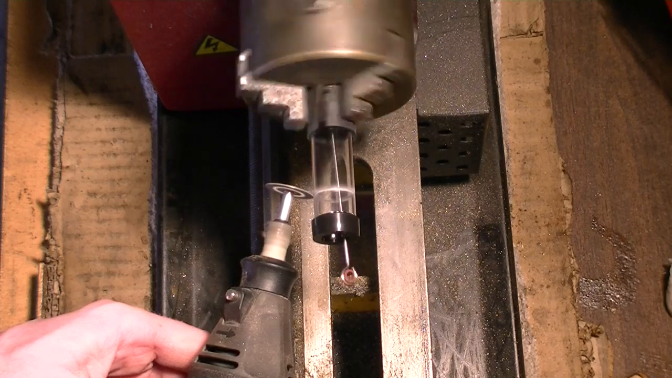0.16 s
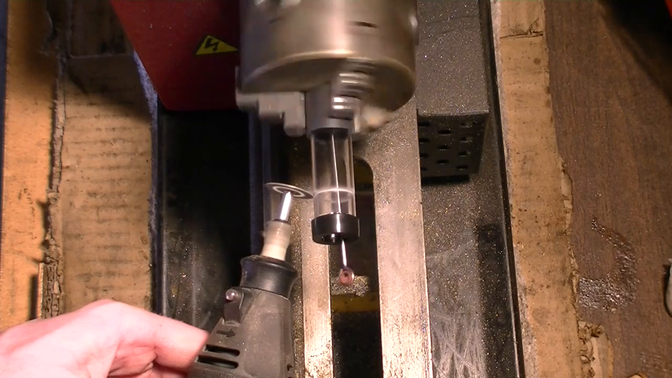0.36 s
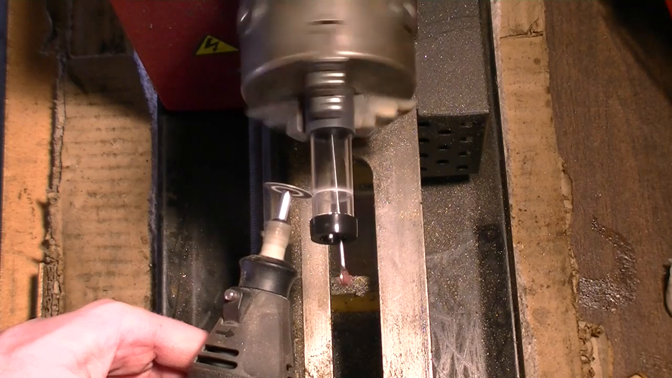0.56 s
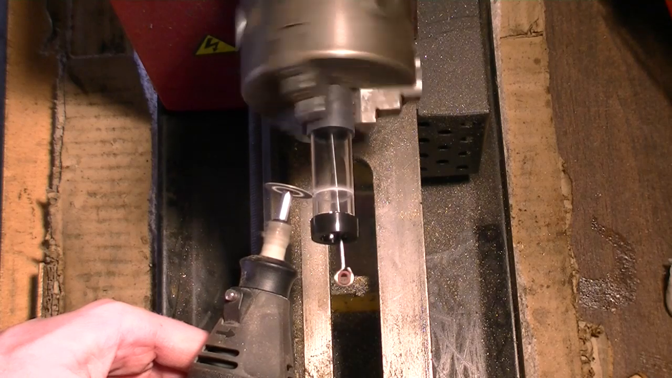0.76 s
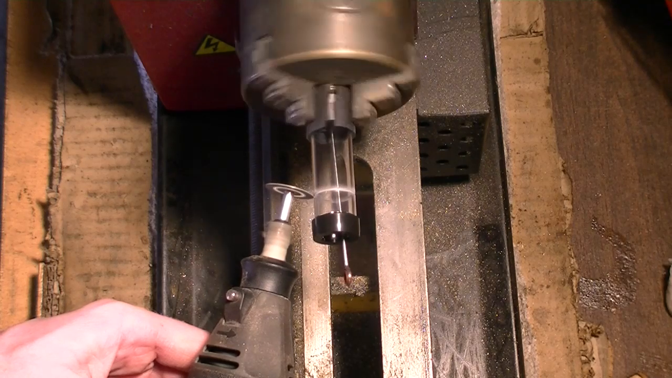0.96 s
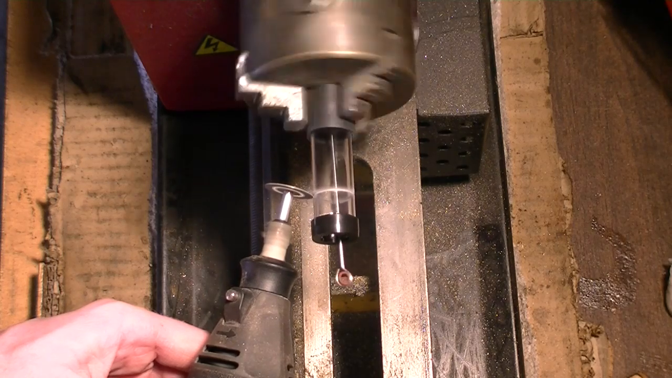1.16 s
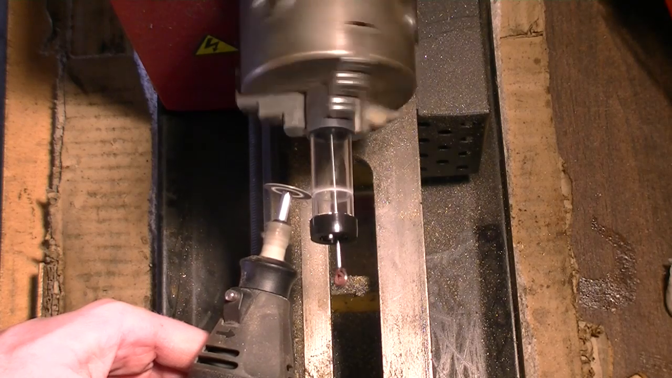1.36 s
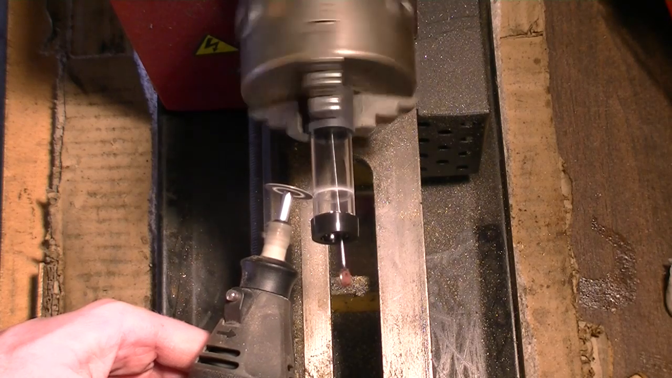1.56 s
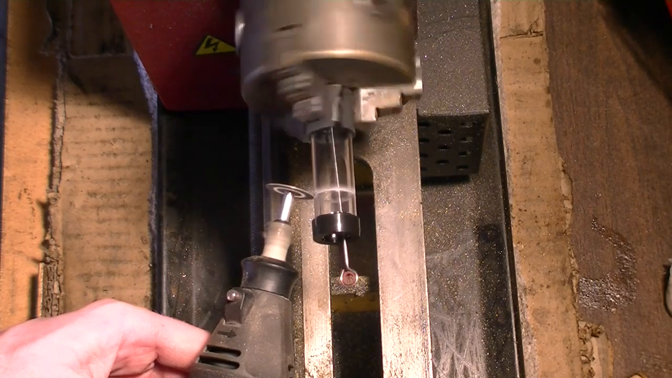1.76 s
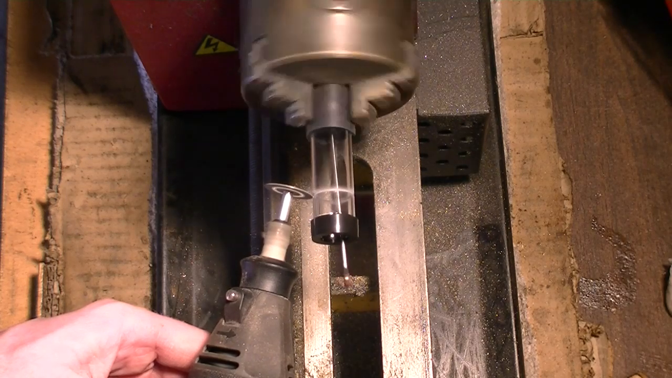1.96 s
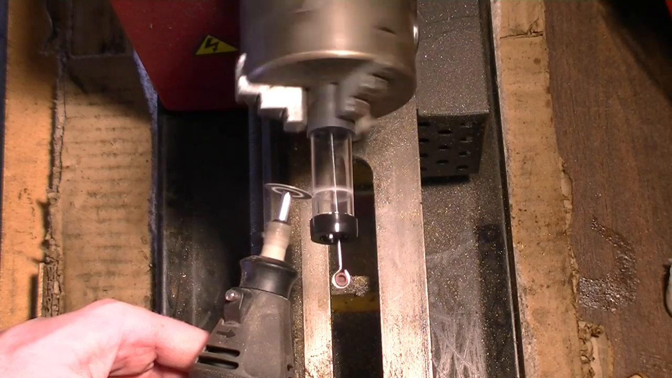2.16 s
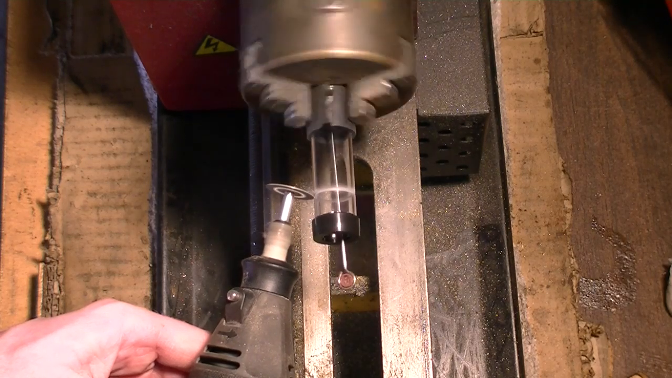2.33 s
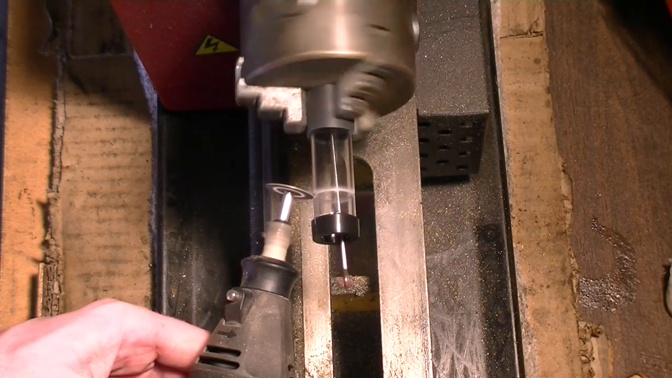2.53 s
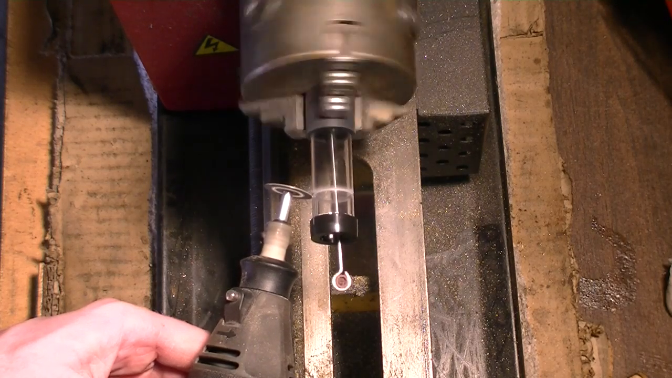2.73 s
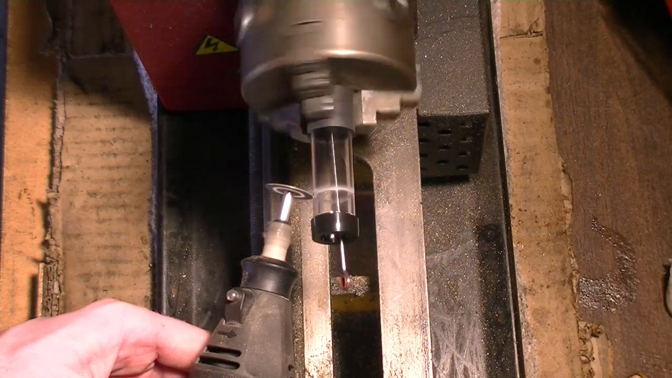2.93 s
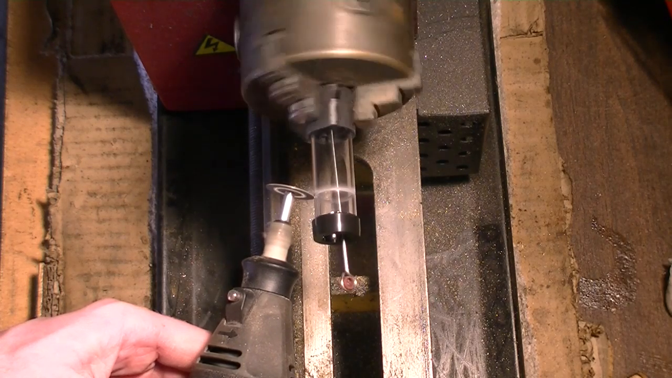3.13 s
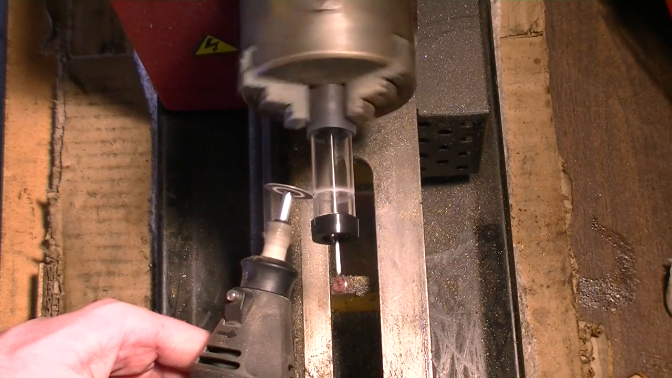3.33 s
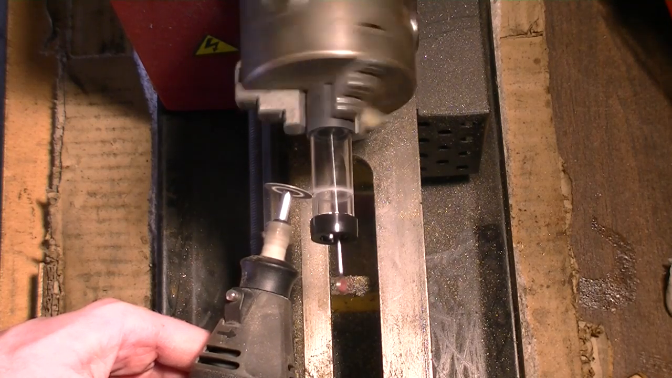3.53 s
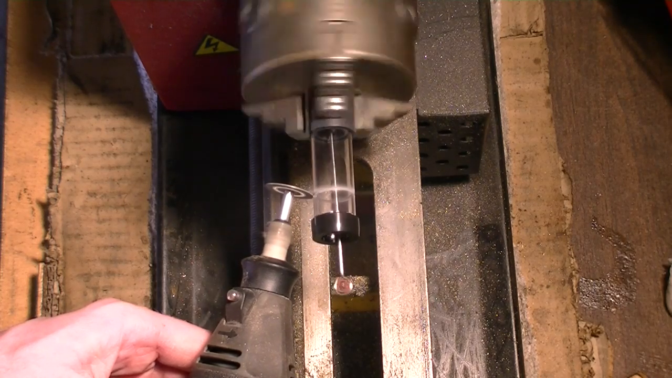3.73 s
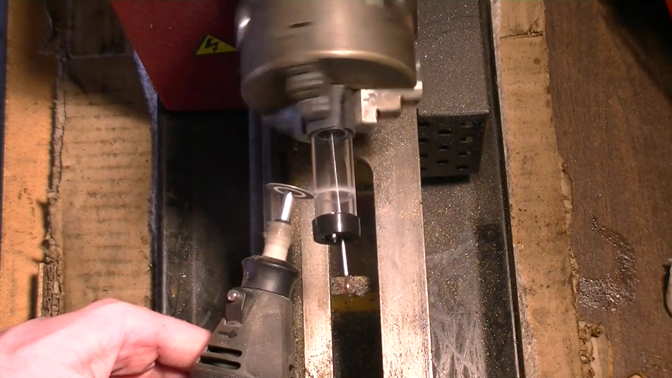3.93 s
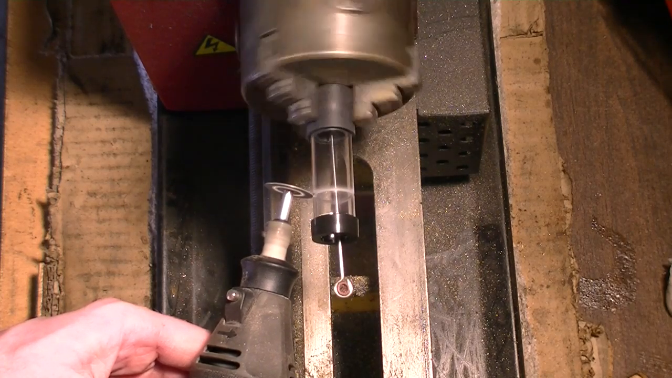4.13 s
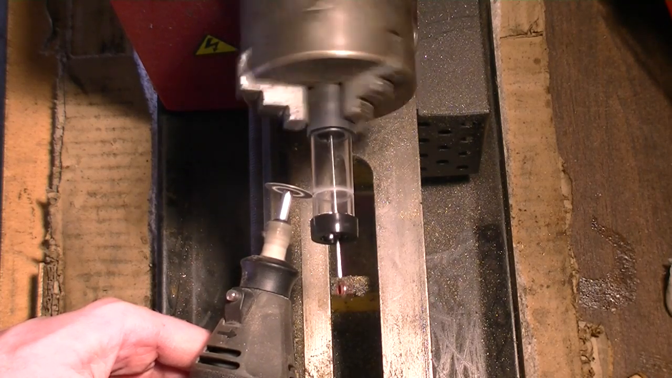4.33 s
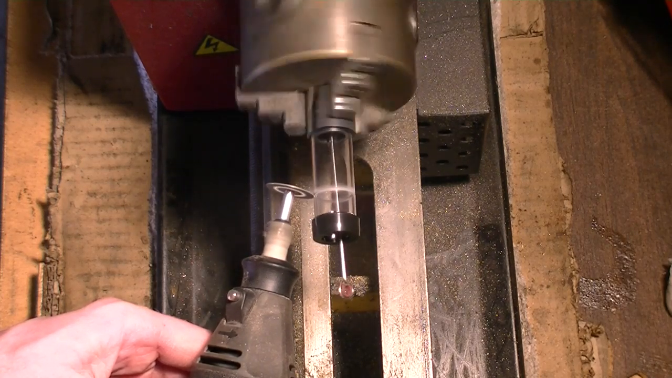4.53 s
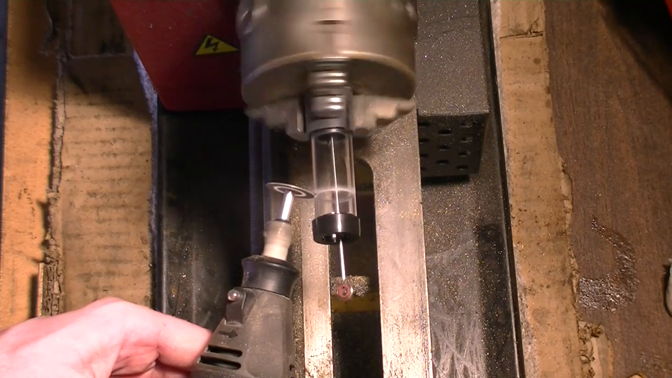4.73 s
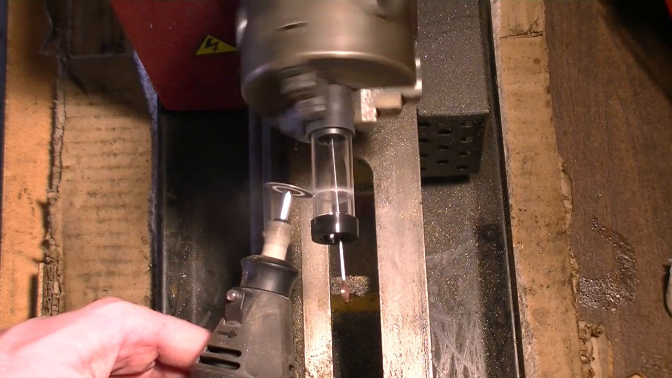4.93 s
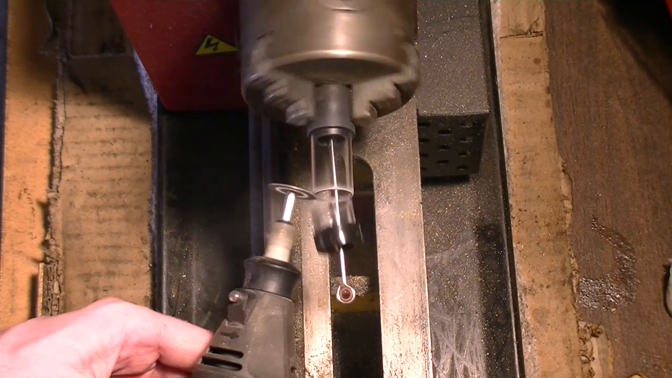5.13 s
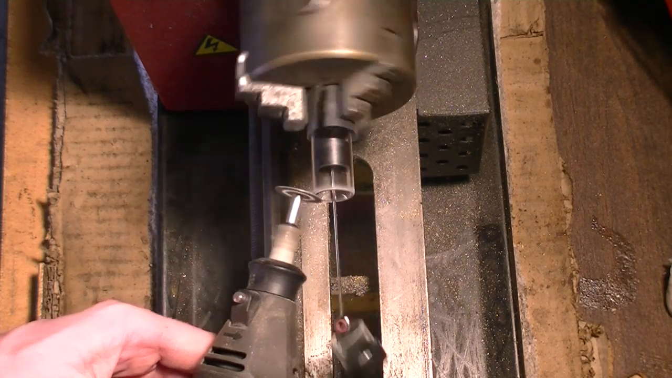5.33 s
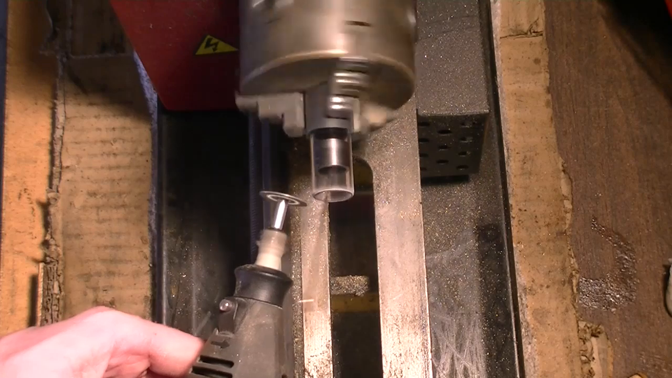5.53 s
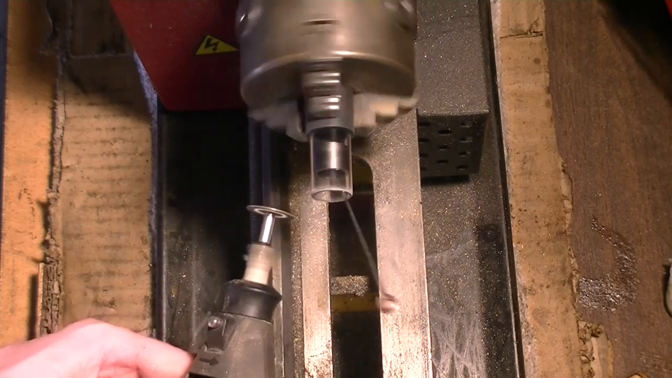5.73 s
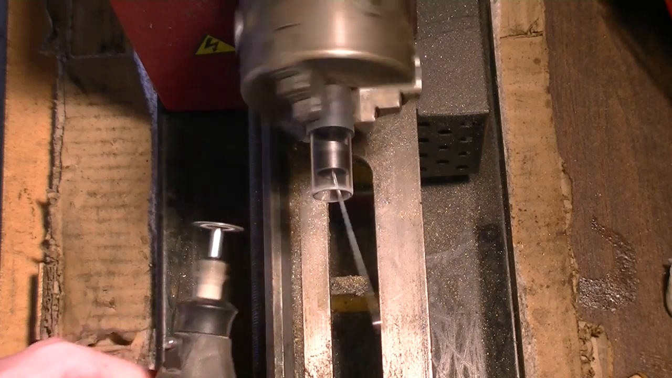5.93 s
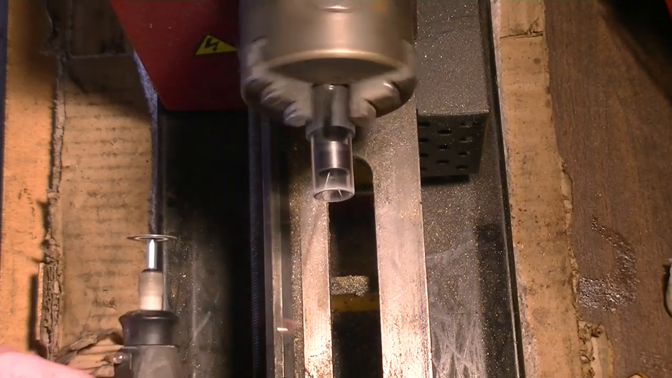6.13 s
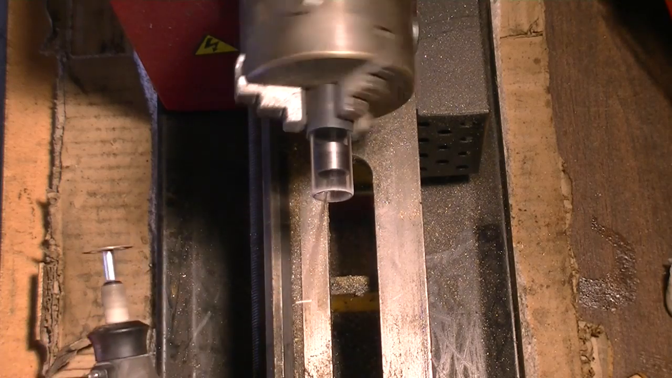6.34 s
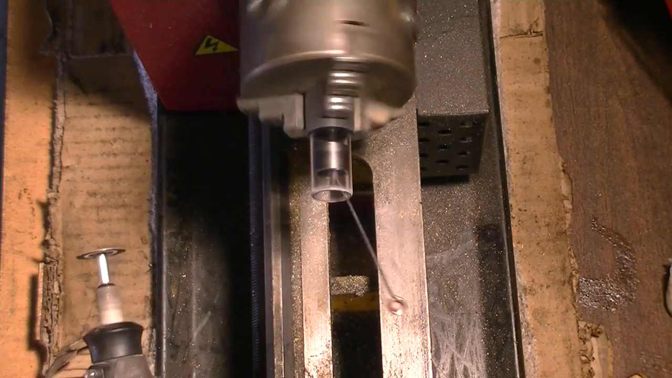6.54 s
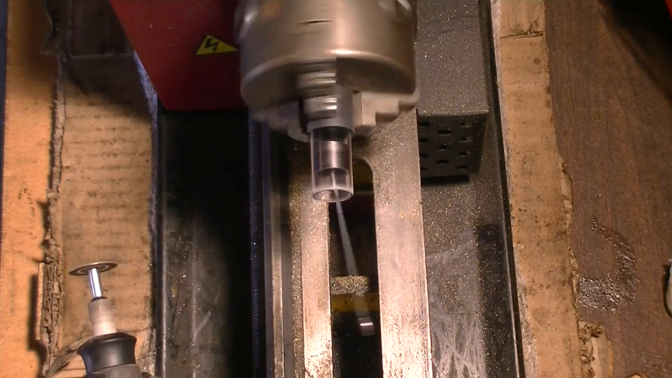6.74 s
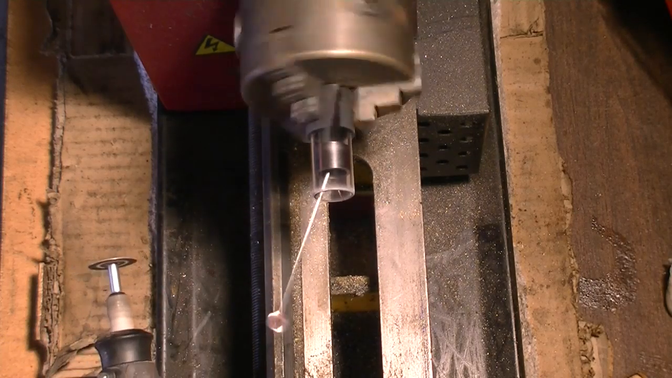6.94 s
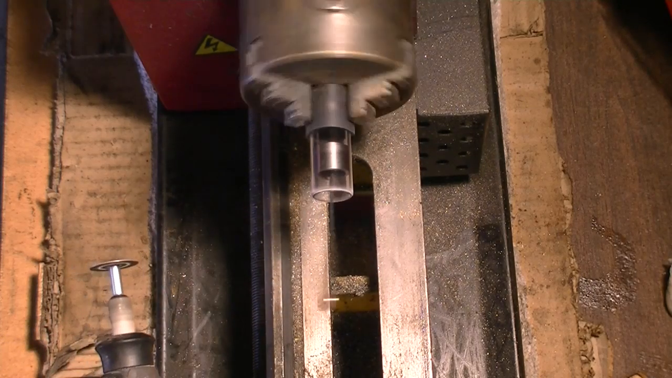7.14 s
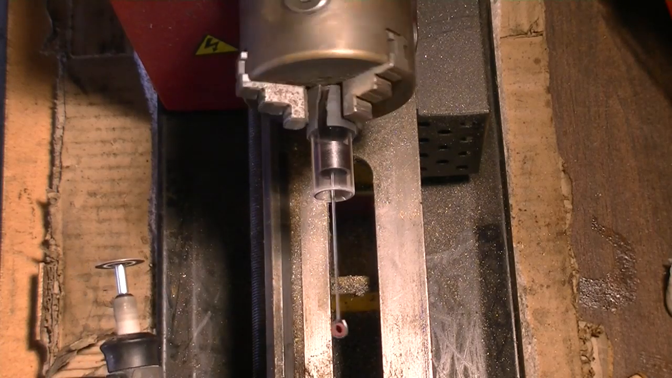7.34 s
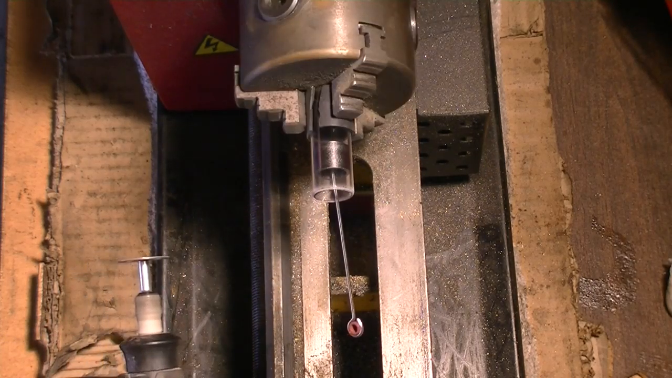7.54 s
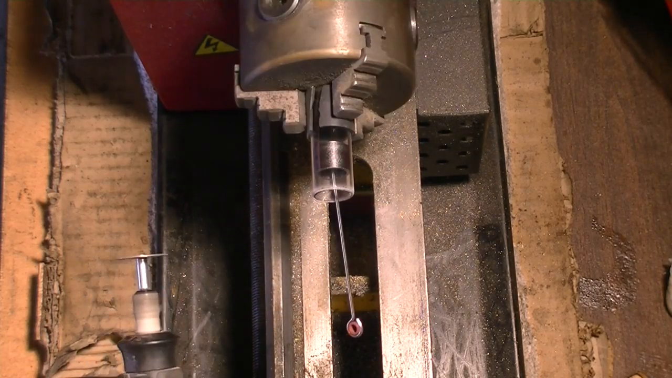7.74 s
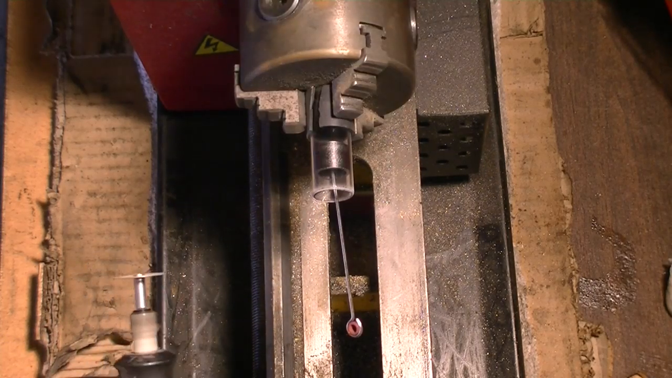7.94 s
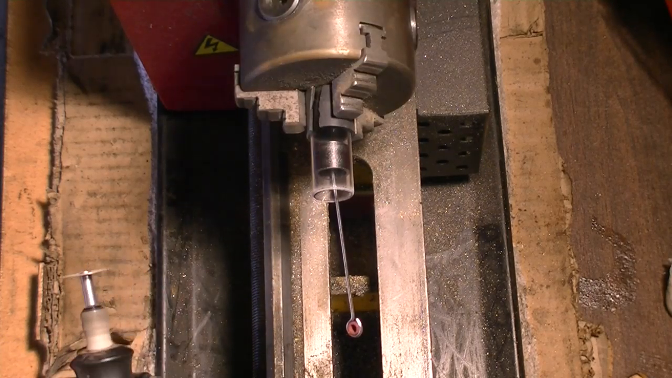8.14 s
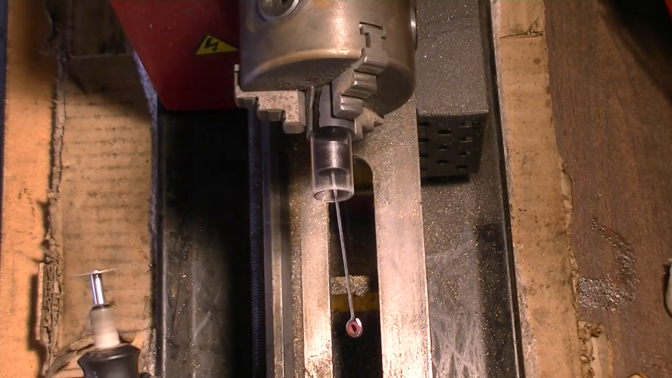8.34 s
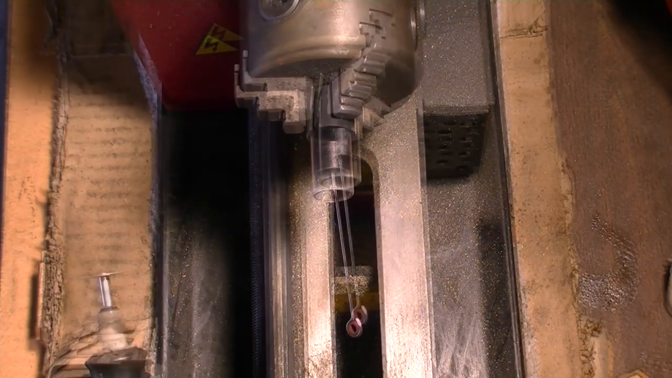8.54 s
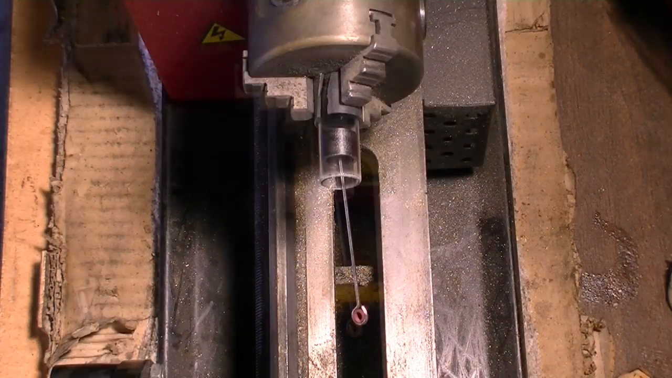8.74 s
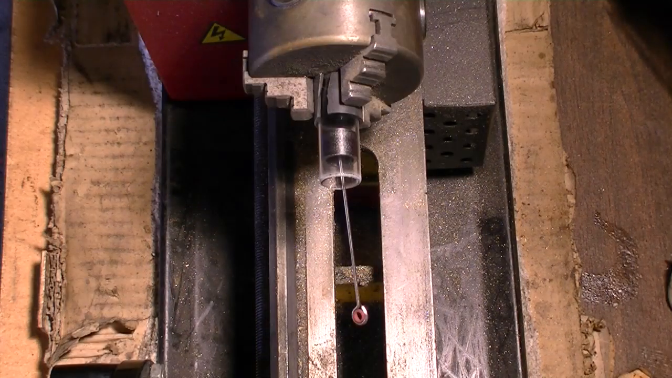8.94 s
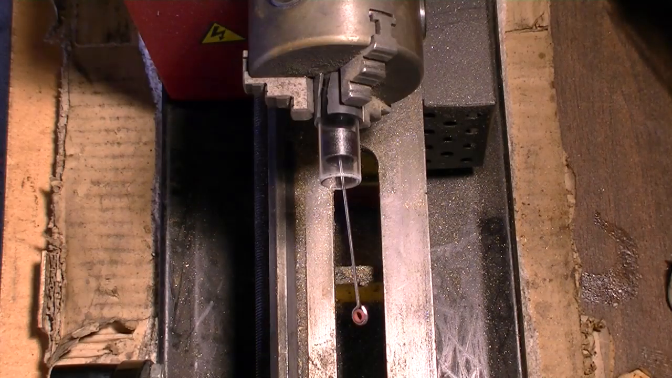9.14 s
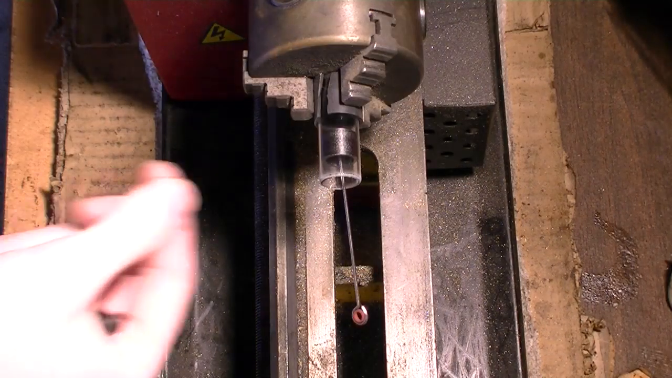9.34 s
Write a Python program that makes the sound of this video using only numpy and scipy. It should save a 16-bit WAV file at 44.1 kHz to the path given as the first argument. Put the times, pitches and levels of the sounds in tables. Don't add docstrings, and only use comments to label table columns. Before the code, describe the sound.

From 0 to 5.2 seconds, a handheld rotary tool grinds a turning glass tube close to the microphone: a harsh, very bright screech with gritty hiss, fluttering tones and a pulse nearly four times a second. Its pitch sinks gradually as the motor labours; a lathe hums and rumbles faintly beneath. At about 5.25 the glass chatters, crunches and snaps for a tenth of a second, and the freed tool climbs to a steady whine with a buzzing mains throb and rushing vent air, growing more audible as automatic gain recovers. At 5.93 the cut end lands with a sharp, short clack. The lathe fades and clicks to a stop near 7.2. At 7.98 a switch clicks and the tool's whine and air glide downward, stopping by 9. Quiet room air remains, with a faint hand rustle around 9.2.

```python
import sys
import numpy as np
from scipy import signal
from scipy.fft import rfft, irfft, next_fast_len
from scipy.io import wavfile
from scipy.ndimage import uniform_filter1d

SR = 44100
rng = np.random.default_rng(int(sys.argv[2]) if len(sys.argv) > 2 else 0)


def volts_from_db(level):
    exponent = np.asarray(level, float) / 20
    return 10 ** exponent


def log_audio(samples):
    frames = np.atleast_2d(samples).T
    limited = np.clip(frames, -1, 1)
    pcm = np.round(limited * 32767).astype(np.int16)
    wavfile.write(sys.argv[1], SR, pcm)


N = 414099
STEP = 64
TIME = np.arange(N) / SR
SLOW = TIME[::STEP]
SIZE = next_fast_len(N)
BINS = np.maximum(np.fft.rfftfreq(SIZE, 1 / SR), 1)
MAINS_PULSE_HZ, MAINS_PULSE_S = 120.07, 5.9058
PARTED_S, SWITCH_OFF_S, COAST_S = 5.22, 7.962, 7.952


def rms_one(x):
    return x / np.sqrt(np.mean(x ** 2) + 1e-20)


def in_time(rows):
    s, *columns = np.transpose(rows)
    return [np.interp(TIME, s, c) for c in columns]


def at_hz(points, hz):
    return np.interp(np.log(hz), np.log(np.array(points)[:, 0]), np.array(points)[:, 1])


def every_sample(slow):
    return np.interp(TIME, SLOW, slow)


def humps(rows, power=2):
    return sum((db * np.exp(-((SLOW - s) / length) ** power) for s, db, length in rows), 0 * SLOW)


def filtered(x, gain):
    return irfft(rfft(x, SIZE) * gain, SIZE)[:N]


def coloured(spectrum):
    return rms_one(filtered(rng.standard_normal(N), volts_from_db(at_hz(spectrum, BINS))))


def bump(hz, width_hz):
    return 1 / np.sqrt(1 + (2 * (BINS - hz) / width_hz) ** 2)


def rumble(hz, width_hz, db):
    return volts_from_db(db) * rms_one(filtered(rng.standard_normal(N), bump(hz, width_hz) ** 2))


def band(x, low_hz, high_hz):
    part = signal.sosfilt(signal.butter(3, [low_hz, high_hz], "band", fs=SR, output="sos"), x)
    return part / np.sqrt(uniform_filter1d(part ** 2, size=3500) + 1e-20)


def drift(rate):
    knots = rng.standard_normal(400)
    return np.interp(SLOW * rate, np.arange(len(knots)), knots) * 1.2


def spread(slow, count):
    rise = np.diff(slow, append=slow[-1])[:, None]
    return (slow[:, None] + rise * (np.arange(STEP) / STEP)).ravel()[:count]


def tone(level_db, phase, wobble):
    blocks = len(phase) // STEP + 1
    turns = (phase + spread(wobble[:blocks], count=len(phase))) / (2 * np.pi)
    wave = np.cos((2 * np.pi * (turns - np.floor(turns))).astype(np.float32))
    return spread(volts_from_db(level_db[:blocks]), count=len(phase)) * wave


def strike(clicks, modes):
    out = 0
    for hz, level_db, t60 in modes:
        r, w = volts_from_db(-60 / (t60 * SR)), 2 * np.pi * hz / SR
        poles = [1, -2 * r * np.cos(w), r * r]
        out = out + signal.lfilter([0, volts_from_db(level_db) * np.sin(w)], poles, clicks + 1e-18)
    return signal.sosfilt(signal.butter(2, 350, "high", fs=SR, output="sos"), out)


def hits(rows, modes, level_db):
    out = np.zeros(N)
    for s, peak_db in rows:
        clicks = np.zeros(SR // 4)
        clicks[0] = volts_from_db(peak_db + level_db)
        start = round(s * SR)
        out[start:start + SR // 4] += strike(clicks, modes)
    return out


def sings(multiple):
    # multiple of the speed, middle in seconds, level in dB, half length in seconds.
    songs = [(10, 1.12, 17, .1), (10, 1.75, 9, .45), (11, 2.6, 11, 1.0), (12, 1.35, 9, .4),
             (13, 1.1, 9, .5), (13, 1.4, 5, .15), (13, 2.8, 6, .55), (14, 1.9, 8, 1.1), (14, 3.3, 5, .3),
             (15, 1.4, 9, .2), (15, 3.7, 6, .35), (16, 1.8, 4, .25), (17, 4.4, 4, .2), (18, .5, 8, .7),
             (16, .3, 5, .4), (11, 3.3, 4, .25), (16, 8.02, 7, .07), (18, 1.9, 5, .1), (18, 3.8, 1, .4),
             (19, 1.0, 9, .2), (19, 4.7, 6, .35), (20, 1.5, 6, .55), (21, 4.2, -7, .6), (22, .2, 8, .35),
             (22, 1.9, 7, .3), (23, 1.4, 9, .6), (23, 4.7, 8, .5), (24, 1.2, 6, .6), (24, 4.9, 7, .5),
             (25, 1.2, 4, .5), (26, 3.9, 4, .7), (5, .9, 5, .5), (6, 1.6, 5, .5), (7, 1.5, 5, .5),
             (16, 6.25, 6, .2), (16, 6.49, -10, .03), (15, 6.4, 6, .4), (17, 6.42, 6, .06),
             (18, 7.96, -8, .03), (18, 8.4, -3, .12), (24, 8.1, -4, .1), (18, 7.6, 2, .3),
             (17, 3.2, -4, .5), (6, 2.8, -4, .5), (22, 8.56, 8, .1), (24, 8.6, 4, .1)]
    return humps([row for k, *row in songs if round(k) == multiple], power=4)


def room_air():
    # frequency in Hz, level in dB per Hz.
    room_spectrum = [(15, -37), (30, -10), (80, -9), (176, -13), (219, -5), (363, -16.5), (573, -11.5),
                     (621, -15.5), (952, -16), (1120, -24.5), (1860, -28.5), (2130, -36), (8320, -44),
                     (15000, -85)]
    return volts_from_db(-56 + 2.5 * (TIME < PARTED_S)) * coloured(room_spectrum)


def lathe():
    # frequency in Hz, level in dB rms.
    gear_tones = [(593, -43.5)]
    # frequency in Hz, width in Hz, level in dB rms.
    bearings = [(265, 30, -49.5), (313, 51, -48.5), (478, 350, -49), (126.7, 28, -59), (638, 160, -48)]
    stopping = (7.1, 7.23)
    out = np.zeros(N)
    for hz, db in gear_tones:
        out += tone(db + 3.5 + 3.3 * drift(9.9), 2 * np.pi * hz * TIME, 0.25 * drift(5.1))
    for hz, width, db in bearings:
        out += rumble(hz, width, db)
    return out * np.interp(TIME, stopping, [1, 0])


def rustle():
    # time in seconds, level in dB.
    hand_moves = [(8.95, -75), (9.1, -67), (9.17, -60), (9.19, -66), (9.22, -53), (9.27, -63),
                  (9.31, -62.5), (9.39, -61)]
    cloth = coloured([(800, -4), (2500, -4), (7000, -6.5), (9000, -7), (12000, -25)])
    return volts_from_db(*in_time(hand_moves)) * cloth * (TIME > 8.9)


def latch_clicks():
    # time in seconds, peak in dB.
    switch = [
        (7.9862, -15),
    ]
    # time in seconds, peak in dB.
    spindle = [
        (7.212, -18),
    ]
    # frequency in Hz, level in dB, time to fall 60 dB in seconds.
    latch = [(3300, 2, .015), (4830, -4, .012), (1613, -8, 0.015), (7000, -15, .01)]
    return hits(switch + spindle, latch, 0.0)


def end_drops():
    # time in seconds, peak in dB.
    landings = [(5.9255, -1), (5.9264, -9), (5.9278, -12), (5.9292, -15), (5.9312, -17), (5.937, -24)]
    # frequency in Hz, level in dB, time to fall 60 dB in seconds.
    bed = [(481.5, -4, 0.055), (750, -7.5, 0.019), (1050, -10, 0.018), (1405, -2, 0.0099),
           (1860, -12, 0.017), (3570, -7, 0.01017), (4560, -10, 0.026), (5370, -7, 0.022),
           (7880, -10, 0.016), (10500, -15, .008)]
    # frequency in Hz, level in dB.
    burst = [(400, -24), (800, -3), (1500, 0), (2200, -2), (4000, -10), (12000, -30)]
    after = TIME - landings[0][0]
    fade = np.exp(-np.clip(after, 0, .2) / .0055) * (after > 0) * (after < .2)
    return hits(landings, bed, -8.5) + volts_from_db(-12) * coloured(burst) * fade


def loose_end():
    # time in seconds, peak in dB.
    snaps = [(5.2563, -19), (5.2705, -24), (5.3375, -27), (5.354, -30)]
    # frequency in Hz, level in dB, time to fall 60 dB in seconds.
    splinter = [(8020, 0, .02), (6200, -8, .008), (4700, -6, .012)]
    # time in seconds, peak in dB.
    taps = [(5.2658, -16), (5.2857, -18)]
    # frequency in Hz, level in dB, time to fall 60 dB in seconds.
    tapped = [(2320, 0, .07), (4400, -6, .03)]
    # time in seconds, peak in dB.
    rattles = [(5.309, -22), (5.331, -26), (5.345, -30)]
    # frequency in Hz, level in dB, time to fall 60 dB in seconds.
    rattling = [(1780, -2, .05), (1100, -3, .04), (900, -5, .04)]
    return hits(snaps, splinter, -7.0) + hits(taps, tapped, -10.0) + hits(rattles, rattling, -9.0)


def shaft_speed():
    # time in seconds, speed in turns per second.
    braked = [(0.0, 369.5), (.2, 364.3), (.45, 355.5), (.55, 352), (.7, 344.3), (1.0, 338.2), (1.2, 334.9),
              (1.6, 331.4), (2.2, 321.4), (2.6, 317.3), (3.2, 306.2), (3.55, 303.6), (3.9, 298.4),
              (4.05, 299.2), (4.6, 291.3), (4.9, 284.9), (5.05, 281.3), (5.22, 281.5)]
    speed, = in_time(braked)
    tube_turn = 2 * np.pi * 3.68 * (TIME + 0.006)
    speed = speed + 1.3 * np.cos(tube_turn) * (TIME < PARTED_S)
    idle, spin_up_s = 382.6, .415
    speed = speed + (idle - speed) * (1 - np.exp(-np.maximum(TIME - PARTED_S, 0) / spin_up_s))
    drag_per_s, friction_hz_per_s = 0.4, 214
    lost = 1 - np.exp(-drag_per_s * np.maximum(TIME - COAST_S, 0))
    return np.maximum(speed - (speed + friction_hz_per_s / drag_per_s) * lost, 60)


def mains_phase():
    return 2 * np.pi * MAINS_PULSE_HZ * (TIME - MAINS_PULSE_S)


def motor_hum():
    hum = tone(-60 + 3.0 * drift(8), 2 * np.pi * 120 * TIME, .3 * drift(5))
    return hum * (TIME < SWITCH_OFF_S)


def slot_whine(speed, turn, level_db):
    # sideband number, level in dB.
    sidebands = [(0, 3.5), (1, 1.5), (2, -2), (3, -10.5), (4, -22)]
    # frequency in Hz, level in dB.
    shell = [(2000, -24.5), (2400, -2.5), (2750, -3.5), (2950, -1), (3200, -9.5), (3600, -11),
             (5000, -23.5), (6100, -18.5), (6500, -20)]
    # frequency in Hz, half width in Hz, level in dB.
    shell_dips = [(2972, 25, -6), (3143, 25, -8), (3045, 40, 2)]
    # time in seconds, level in dB, length in seconds.
    whine_swells = [(6.1, -2, .15), (6.85, 2, .25), (7.8, -2, .15), (.4, -1.5, .2), (1.1, 1.5, .3),
                    (5.6, -1.5, .1)]
    steady_lag = .45
    out, off = np.zeros(N), round(SWITCH_OFF_S * SR)
    mains = mains_phase()[:off]
    swell_db = humps(whine_swells)
    for slots in (8, 16):
        for k, side_db in sidebands:
            for sign in ((1, -1) if k else (1,)):
                hz = slots * speed + sign * k * MAINS_PULSE_HZ
                shell_db = at_hz(shell, hz)
                for at, width, db in shell_dips:
                    shell_db = shell_db + db * np.exp(-((hz - at) / width) ** 2)
                phase = slots * turn[:off] + sign * k * mains - steady_lag * (k == 0)
                line_db = side_db + shell_db + swell_db + 1.37 * drift(12)
                out[:off] += tone(line_db, phase, 0.15 * drift(19))
    return volts_from_db(level_db) * out * np.clip((SWITCH_OFF_S - TIME) / 0.021, 0, 1)


def fan(speed, turn, tone_db, flicker_db, throb):
    # frequency in Hz, level in dB per Hz.
    air_spectrum = [(150, -43), (330, -27.5), (700, -27), (1000, -17), (1300, -15.5), (1700, -19),
                    (2300, -24), (3300, -13.5), (4800, -14.5), (6200, -6.5), (7600, 1), (8500, -1.5),
                    (10500, -10.5), (15500, -28.5)]
    # level in dB at full speed, dB lost per halving of speed.
    air_laws = [(-26.5, 20.5), (-38, 15), (-27.5, 19)]
    # time in seconds, level in dB, length in seconds.
    vent_facing = [(5.7, 3, .08), (6.2, 3.5, .2), (6.7, -1.5, .2), (7.62, 2.5, .12), (7.975, -5, .02)]
    # multiple of shaft speed, level in dB, dB lost per halving of speed.
    running_tones = [(1, -17, 25), (3, -12, 40), (6, -22, 20), (15, -17, 20), (14, -20, 10), (17, -15, 25),
                     (18, -.5, 12), (20, -13, 6), (21, -15, 20), (22, -12, 6), (26, -18, 6), (30, -16, 6),
                     (28, -12, 3), (36, -16, 14), (8, -19, 6), (16, -11.5, 1.5), (24, -7, 1), (32, -8, 1),
                     (40, -8, 1), (48, -5, 1), (56, -4, 2), (64, -4, 3), (72, -6, 4)]
    # frequency in Hz, level in dB.
    housing = [(100, -3), (2300, 0), (2900, -2), (3500, 3), (4300, 2), (5200, 0.5), (5700, -3.5),
               (6200, 2.5), (7200, -2), (7800, -4), (8600, 2), (9300, -21), (12000, -20), (16000, -40)]
    halvings = np.log2(speed / speed.max())
    levels = [every_sample(db + loss_db * halvings + .8 * drift(6)) for db, loss_db in air_laws]
    bright_db, middle_db, vent_db = levels
    bright_db = bright_db + every_sample(humps(vent_facing))

    air = coloured(air_spectrum) * (1 + throb * np.cos(mains_phase()) * (TIME < SWITCH_OFF_S))
    above_vent = 1 / (1 + (2300 / BINS) ** 8)
    above_middle = 1 / (1 + (5700 / BINS) ** 8)
    out = volts_from_db(bright_db - 2.5) * rms_one(filtered(air, np.sqrt(above_middle)))
    out += volts_from_db(middle_db + 4.0) * rms_one(filtered(air, np.sqrt(above_vent - above_middle)))
    out += volts_from_db(vent_db - 3.5) * rms_one(filtered(air, np.sqrt(1 - above_vent)))

    tone_db = tone_db - 10.5 * np.clip(1 - speed / 135, 0, 1) ** .5
    tone_db = tone_db + bright_db[::STEP] - 1.5 * halvings
    coasting = SLOW > COAST_S
    for k, level_db, loss_db in running_tones:
        level_db = level_db + sings(k) * (SLOW > 5.3) + loss_db * halvings + tone_db
        level_db = level_db + at_hz(housing, k * speed) + flicker_db * (1 + .6 * coasting) * drift(35)
        out += tone(level_db, k * turn, (0.38 + .8 * coasting) * drift(40))
    return out * np.clip((8.99 - TIME) / .15, 0, 1)


def chatter(turn, scratch, crunch_db):
    # time in seconds, peak in dB, seconds to rise 10 dB, seconds to fall 10 dB.
    bursts = [(5.2575, -40, .0025, .007), (5.273, -36, .015, .012), (5.2865, -23, .0012, .013),
              (5.302, -26, .012, .02), (5.321, -22, .03, .005), (5.335, -33, .01, .025)]
    # frequency in Hz, level in dB, time to fall 60 dB in seconds.
    tube = [(1820, -11.5, 0.09), (2400, -12, 0.05), (3630, 4.5, 0.049), (3940, -5.5, .008), (4161, -2, .02),
            (4500, 2.5, 0.035), (4780, -8, 0.0099), (5954, -4.5, 0.021), (6800, -9, .01), (7900, -2, 0.02),
            (8800, -6, 0.01), (11500, 0, 0.015), (1120, -34, 0.03), (1390, -36, .015)]
    span = slice(round(5.1 * SR), round(5.6 * SR))
    at, out = TIME[span], np.zeros(N)
    new_turn = np.diff(np.floor(turn[span] / (2 * np.pi)), prepend=0).clip(0, 1)
    knocks = new_turn * (1 + .3 * rng.standard_normal(len(at)))
    rings = rms_one(strike(knocks + scratch * rng.standard_normal(len(at)), tube))
    crunch = coloured([(900, -45), (1500, -16), (3200, -4.5), (4000, 0), (4900, -2), (5600, -7),
                       (8500, -10), (12000, -19), (14500, -30)])
    shapes = [db - 10 * np.where(at < s, (s - at) / rise, (at - s) / fall) for s, db, rise, fall in bursts]
    knock_db = np.maximum(np.max(shapes, axis=0), -200)
    out[span] = volts_from_db(knock_db) * (rings + volts_from_db(crunch_db) * crunch[span])
    return out


def contact():
    # time in seconds, grinding level in dB, pressure on the tube in dB.
    hand = [(0, -22, -4), (.3, -22, -10), (.6, -22.5, -6), (1.0, -22.5, -1), (1.2, -22.5, 4),
            (1.42, -22.5, 5), (1.62, -22.5, 0), (1.8, -22.5, 4), (2.2, -22.5, 2), (2.48, -22.5, 3),
            (2.6, -22.5, -5), (2.75, -22.5, 2), (3.2, -22.5, -1), (3.5, -22.5, 1), (3.62, -22.5, -4),
            (4.2, -23, -6), (4.45, -23, -3), (5.24, -23, -5)]
    # time in seconds, ring in dB, body in dB, length in seconds.
    bites = [(.29, 1.8, -1, .07), (.51, -2, -2, .03), (1.01, 2, -1, .04), (.83, -2, 0, .02),
             (1.11, -2.5, 0, .02), (1.36, 2.5, 0, .015), (1.53, -2, 0, .03), (1.61, 2, 0, .05),
             (1.88, -3, -8, .02), (1.94, 1, 3, .03), (2.17, 2, 2, .03), (2.6, 2, -2, .03),
             (2.93, 3, 1, .03), (3.02, -2, 0, .02), (3.22, 2, 0, .04), (3.47, 2, 2, .03),
             (3.95, 2.8, 0, .04), (4.05, -2, -2, .03), (4.99, -3, 1, .03), (5.06, 3, 0, .03),
             (5.21, 3, 0, .015)]
    flutter_db = 1.3
    level_db, press_db = (c[::STEP] for c in in_time(hand))
    for s, ring_db, body_db, length in bites:
        shape = np.exp(-((SLOW - s) / length) ** 2)
        level_db, press_db = level_db + ring_db * shape, press_db + body_db * shape
    ring = level_db + 1.3 + .4 * flutter_db * drift(24)
    body = -35.5 + press_db + .6 * flutter_db * drift(14)
    upper = -34 + .5 * press_db + 1.1 * SLOW + flutter_db * drift(13)
    top = -31 + .3 * press_db - .7 * SLOW + flutter_db * drift(11)
    top = top - .8 * (level_db - level_db.mean())
    return [every_sample(db) for db in (ring, body, upper, top)]


def grinding(turn, wander_db, grit_db, gate):
    # frequency in Hz, level in dB per Hz.
    line_spectrum = [(200, -44), (320, -29), (650, -32), (1100, -18.5), (2300, -11), (3200, -20.5),
                     (6400, -15.5), (8300, -14.5), (9200, -13.5), (10500, -19), (11200, -22), (12600, -11),
                     (13600, -32), (15300, -27.5)]
    # frequency in Hz, level in dB per Hz.
    grit_spectrum = [(300, -39.5), (1000, -40.5), (3000, -29.5), (5500, -25), (8000, -25.5), (9200, -21),
                     (10400, -31), (11000, -26), (12500, -26), (13600, -31), (15000, -29), (15600, -34)]
    # frequency in Hz, width in Hz, level in dB.
    cut_modes = [(9814, 320, 24), (1800, 220, 1), (7950, 390, 9.5), (315, 60, 18.5), (3500, 260, 2),
                 (4520, 380, 2)]
    disc_shape = dict([(1, 1.5), (2, 6), (3, 1.5), (4, -5), (5, 1), (6, -3), (7, -0.5), (10, -6), (11, -1),
                       (12, -3), (13, -3), (14, -1), (15, -2), (16, 1), (17, -1), (18, 3), (19, -4),
                       (20, -3), (23, -4), (24, -2), (30, -3), (33, -2)])
    cut = round(5.3 * SR)
    lines = np.zeros(N)
    for k in range(1, 54):
        wander = .35 * drift(2) + .7 * drift(14) + .5 * drift(38)
        level_db = disc_shape.get(k, 0) + sings(k) + wander_db * wander
        lines[:cut] += tone(level_db, k * turn[:cut], .9 * drift(9) + rng.uniform(0, 2 * np.pi))
    ringing = np.prod([1 + (volts_from_db(db) - 1) * bump(hz, width) ** 2 for hz, width, db in cut_modes], axis=0)
    lines = rms_one(filtered(lines, volts_from_db(at_hz(line_spectrum, BINS)) * ringing))
    grit = rms_one(filtered(coloured(grit_spectrum), ringing ** .9 * BINS / (BINS + 120)))
    grit = grit * (1 + gate * np.cos(turn))
    bite = lines + volts_from_db(-18.0) * grit

    ring_db, body_db, upper_db, top_db = contact()
    out = volts_from_db(ring_db) * band(bite, 8700, 11000)
    out += volts_from_db(body_db) * band(bite, 3200, 5200)
    out += volts_from_db(upper_db) * band(bite, 5200, 8700)
    out += volts_from_db(top_db) * band(bite, 11000, 15500)
    out += volts_from_db(-47) * band(lines, 260, 2300)
    out += volts_from_db(grit_db + ring_db) * grit
    out += rumble(179, 21, -69)
    return out * np.clip((5.24 - TIME) / 0.022, 0, 1)


def gain_control():
    # start in seconds, end in seconds, depth in dB, recovery in dB per second.
    ducks = [
        (-1, 7.95, 12.5, 19),
        (-1, 5.3, 14.5, 33),
        (5.929, 5.935, 5, 120),
        (5.929, 6.0, 4, 14),
    ]
    held = 0
    for start, end, db, rate in ducks:
        held = held + np.clip(db - rate * np.maximum(SLOW - end, 0), 0, None) * (SLOW >= start)
    creep_db = .6 * (SLOW - 2.6) * (SLOW < PARTED_S)
    return every_sample(volts_from_db(10.5 - held - creep_db))


def two_channels(mid):
    # frequency in Hz, level in dB.
    width = [(30, -11), (150, 0), (600, -2), (1400, -14), (2200, -18), (7400, -16), (8500, -4), (10300, -5),
             (11300, -10), (12700, -4), (13500, -30)]
    # frequency in Hz, level in dB.
    lean_db = [(60, .5), (300, .3), (1000, -.5), (2000, -.3), (3000, -1.3), (4000, -.3), (6900, -1),
               (9800, -2), (11000, -.3)]
    # frequency in Hz, phase in radians.
    lead = [(1, 0), (340, 0.18), (860, 0.0), (2400, 0), (3010, 0.15), (3600, 0), (8000, 0), (8790, 0.14),
            (9220, 0.81), (9470, -0.3), (9910, 0.2), (10300, -0.1), (10600, 0.0)]
    scatter = np.exp(-TIME[:9000] / 0.032) * rng.standard_normal(9000)
    response = rfft(scatter, SIZE)
    response = response / np.sqrt(uniform_filter1d(abs(response) ** 2, size=3000))
    side = filtered(mid, response * volts_from_db(at_hz(width, BINS) - 6.0))
    lean = volts_from_db(at_hz(lean_db, BINS) / 2) * np.exp(.5j * at_hz(lead, BINS))
    return np.array([filtered(mid + side, lean), filtered(mid - side, 1 / lean)])


def scene():
    speed = shaft_speed()
    turn = 2 * np.pi * np.cumsum(speed) / SR
    slow_speed = speed[::STEP]
    steady = room_air() + lathe() + motor_hum()
    steady += slot_whine(slow_speed, turn, -23.0)
    steady += fan(slow_speed, turn, tone_db=4.5, flicker_db=2.5, throb=0.085)
    contacts = rustle() + latch_clicks() + end_drops() + loose_end()
    contacts += chatter(turn, scratch=.12, crunch_db=-3.0)
    contacts += grinding(turn, wander_db=3.2, grit_db=-12.0, gate=0.38)
    return two_channels(contacts / gain_control() + steady)


def roll_off(x):
    return signal.sosfilt(signal.butter(12, 15750, fs=SR, output="sos"), x)


def record(dry):
    heard = signal.sosfilt(signal.butter(2, 36, "high", fs=SR, output="sos"), dry)
    heard = signal.sosfilt(signal.cheby2(10, 50, 16250, fs=SR, output="sos"), heard)
    return roll_off(heard * gain_control())


dry = scene()
out = record(dry)
log_audio(out)
```